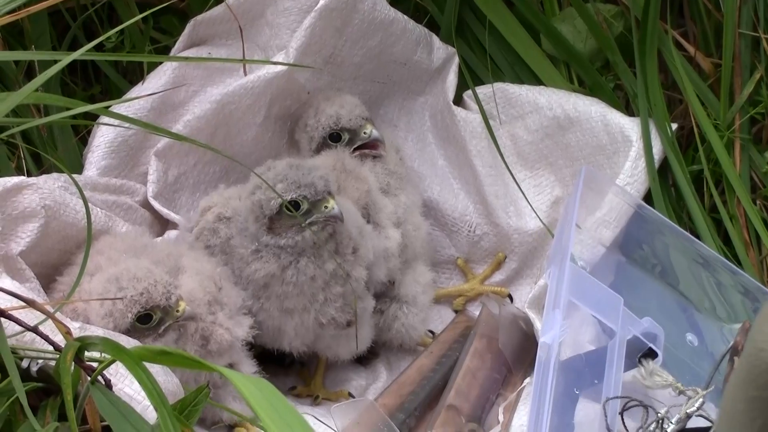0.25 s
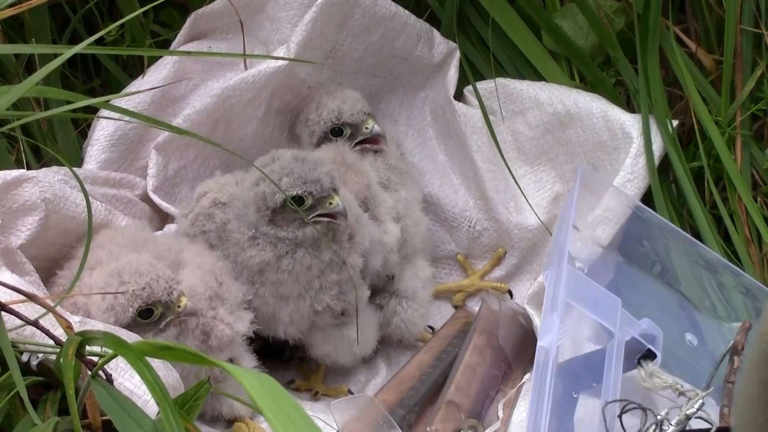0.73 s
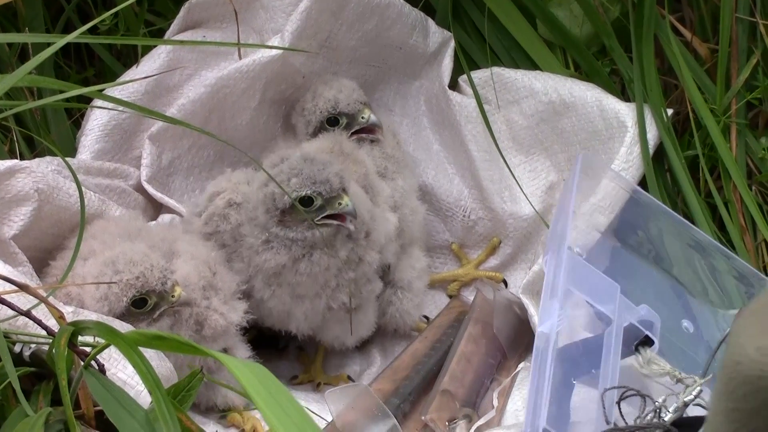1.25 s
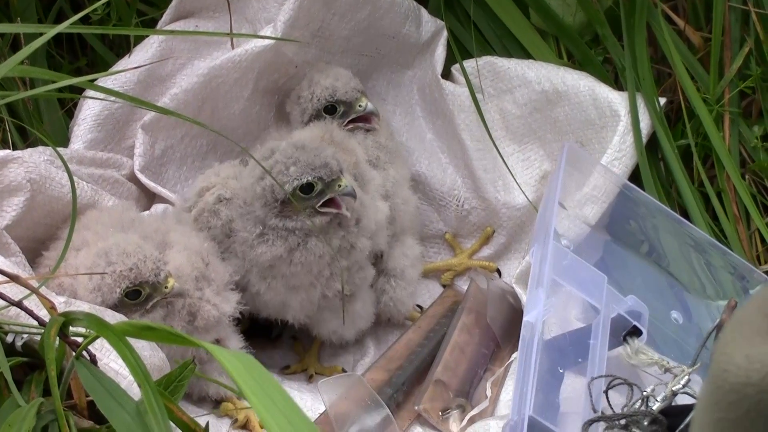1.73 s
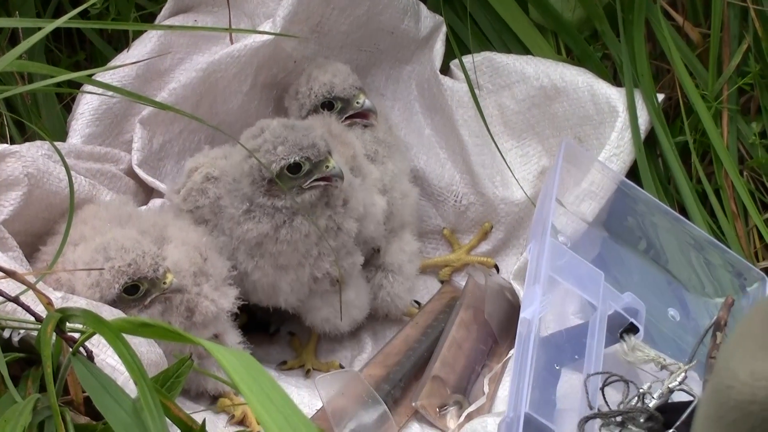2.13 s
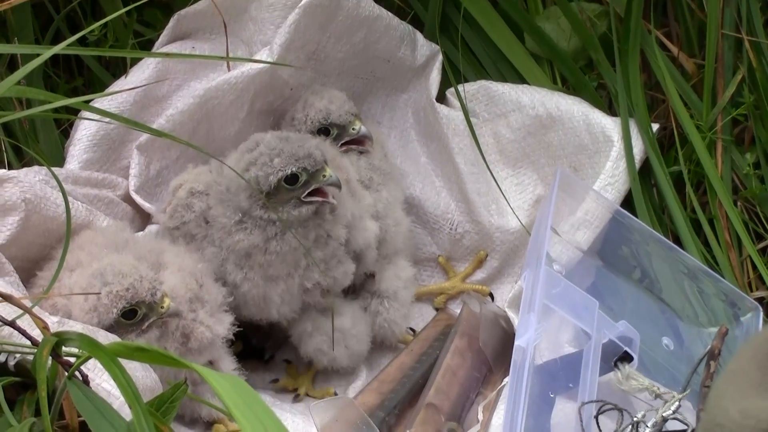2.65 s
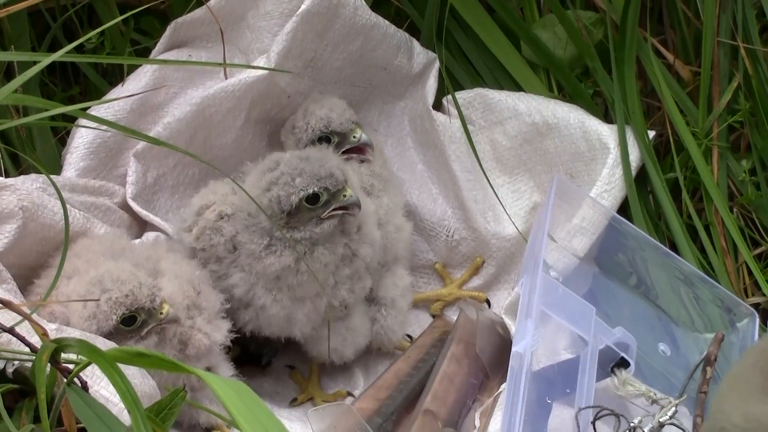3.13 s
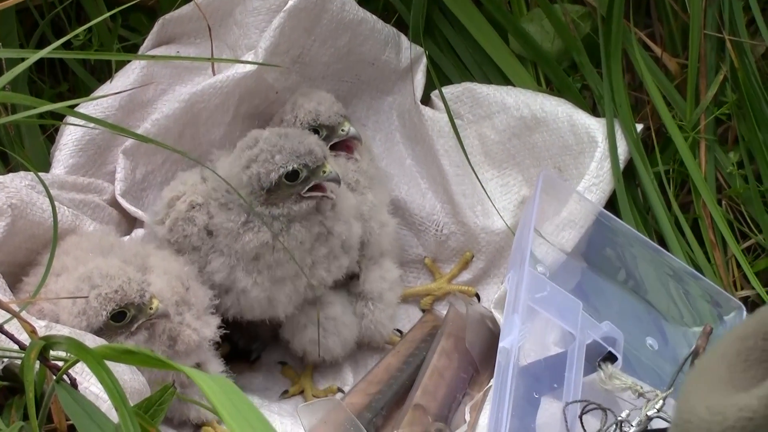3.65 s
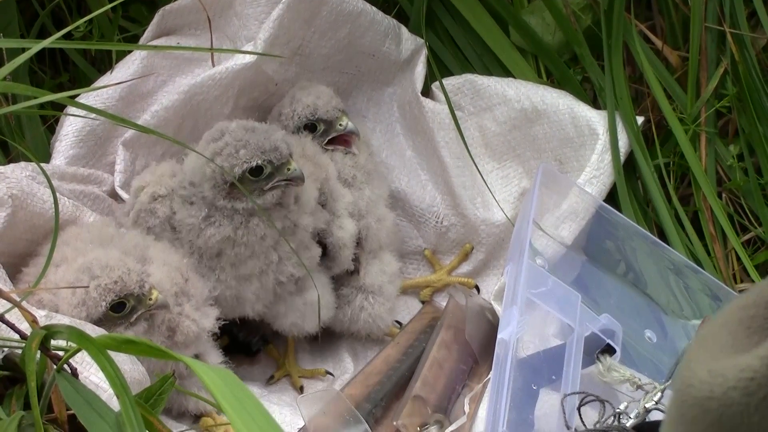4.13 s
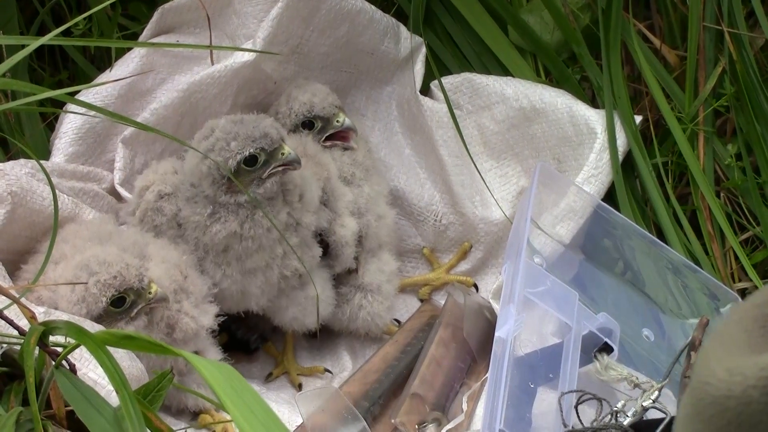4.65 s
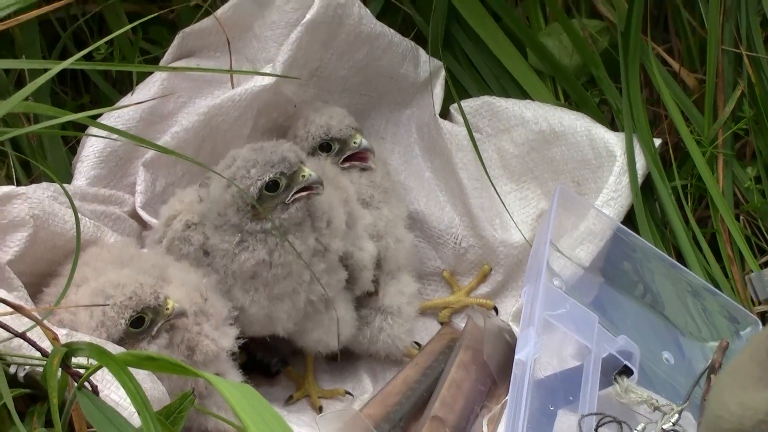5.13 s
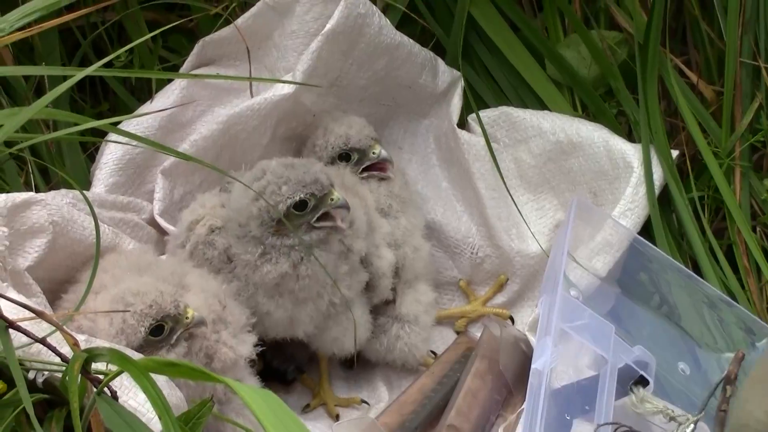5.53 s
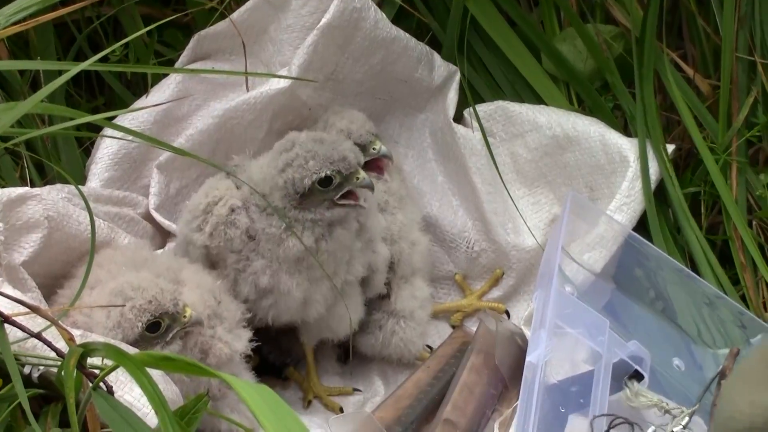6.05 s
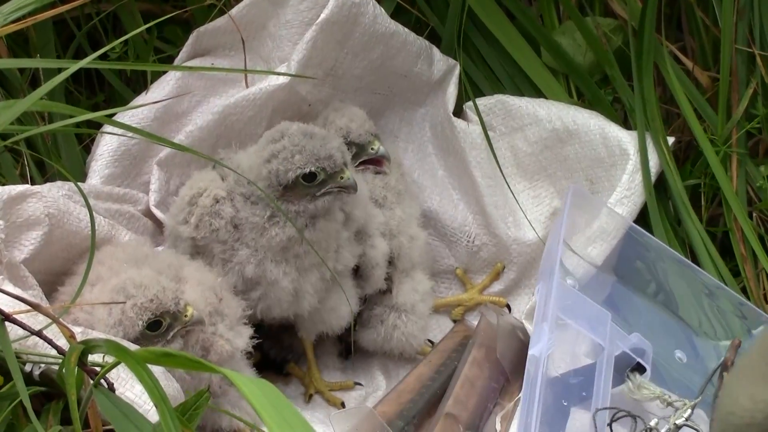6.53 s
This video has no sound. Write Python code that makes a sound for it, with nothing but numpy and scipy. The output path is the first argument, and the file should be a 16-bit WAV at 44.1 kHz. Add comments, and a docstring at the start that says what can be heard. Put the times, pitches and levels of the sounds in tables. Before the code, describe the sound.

A falcon chick cries close by, about four times a second from start to finish, each short cry breaking from a clear note into a rasp and a shrill whistle. A second chick adds soft peeps early on and again in the second half. A plastic box is knocked in a few clusters, small metal things clink, and cloth and grass rustle faintly in quiet open air.

```python
"""Kestrel chicks in the grass.

The nearest chick cries four times a second: each cry opens clear, breaks into a hoarse
period-doubled rasp, leaps to a shrill whistle and drops away. A second adds soft arched peeps.
Beside them a plastic box is knocked, small metal things clink, and cloth and grass rustle."""
import sys
import numpy as np
from scipy import signal
from scipy.fft import rfft, irfft
from scipy.io import wavfile
from scipy.ndimage import uniform_filter1d, minimum_filter1d

SR = 44100
rng = np.random.default_rng(int(sys.argv[2]) if len(sys.argv) > 2 else 0)


def generate_wav(signal):
    """Clip the signal to [-1, 1] and save it as 16-bit WAV at the path in sys.argv[1]."""
    frames = np.transpose(np.atleast_2d(signal))
    scaled = np.clip(frames, -1, 1) * 32767
    pcm = np.round(scaled).astype(np.int16)
    wavfile.write(sys.argv[1], SR, pcm)


N = 299880
TOP_HZ = 16000

# breath through throat and beak: freq_hz, gain_db
BREATH_SPECTRUM = [(500, -41), (1900, -12), (2600, -37), (3400, 0), (4300, -10), (5600, 1.5), (7000, -16),
                   (8600, 4), (10200, -7), (11400, -22), (14500, -19), (16000, -36.5)]
# small metal things: freq_hz, gain_db, t60_s
METAL_MODES = [(5830, -4, 0.037), (7500, -4, 0.072), (9360, -5, 0.049), (10900, -10, 0.07),
               (11290, 5, 0.05), (11310, 0.5, 0.13), (13660, -13, .04)]


def undb(db):
    """Decibels to gain."""
    return 10 ** (np.asarray(db) / 20)


def unit(x):
    """Scale to rms 1."""
    return x / np.sqrt(np.mean(x ** 2) + 1e-18)


def gain_at(hz, spectrum):
    """Gain of a (freq_hz, gain_db) spectrum at hz."""
    freq_hz, gain_db = np.transpose(spectrum)
    return undb(np.interp(np.log(np.maximum(hz, 1)), np.log(freq_hz), gain_db))


def colour(x, spectrum):
    """Filter by a spectrum; rms 1."""
    return unit(irfft(rfft(x) * gain_at(np.fft.rfftfreq(len(x), 1 / SR), spectrum), len(x)))


def coloured_noise(size, spectrum):
    """Noise with a spectrum; rms 1."""
    return colour(rng.standard_normal(size), spectrum)


def wobble(size, hz):
    """Random motion slower than hz; rms about 1."""
    padded = size + SR // 10
    freq_hz = np.fft.rfftfreq(padded, 1 / SR)
    return unit(irfft(rfft(rng.standard_normal(padded)) / (1 + (freq_hz / hz) ** 4)))[:size]


def add(track, start_s, sound):
    """Mix a sound into a track."""
    i = max(int(start_s * SR), 0)
    track[i:i + len(sound)] += sound[:max(N - i, 0)]


def ring(t, modes, scatter_db):
    """Decaying modes; every blow weights them differently."""
    out = 0
    for hz, db, t60_s in modes:
        weight = undb(db + scatter_db * rng.standard_normal()) * rng.choice([-1, 1])
        out = out + weight * np.sin(2 * np.pi * hz * t) * undb(-60 * t / t60_s)
    return out


def partials(hz, phase, orders, throat, treble_db=0, flutter_db=1.5):
    """Multiples of the syrinx's pitch, each weighted by the throat."""
    out = 0
    for k in orders:
        db = treble_db * (k > 2) + flutter_db * (k != 2) * wobble(len(hz), 88)
        out = out + gain_at(k * hz, throat) * undb(db) * (k * hz < TOP_HZ) * np.sin(k * phase)
    return np.sqrt(2) * out


def cry(start_s, open_s, rasp_s, whistle_s, open_hz, top_hz, open_db, treble_db, rough):
    """A clear note rises with pressure, rasps, leaps to a whistle and drops as the pressure goes."""
    # throat and open beak, clear note: freq_hz, gain_db
    clear_throat = [(1100, 10), (1750, -17), (2150, -17), (2600, -13), (3300, 5), (4300, -1), (5000, -15),
                    (6000, -24.5), (6400, -21.5), (7200, -18), (8450, -15.5), (9100, -17.5), (10400, -27.5),
                    (12500, -36), (15000, -41)]
    # the same in the rasp: freq_hz, gain_db
    rasp_throat = [(850, -22.5), (1700, -16.5), (2600, -17), (3350, -2), (4250, -0.5), (5100, -9),
                   (6000, -18.5), (7000, -23), (8600, -34), (10000, -34), (12000, -44), (15000, -50)]
    whistle_db, fall_s, fall_rough = -7.5, .015, .66
    break_s, leap_s, release_s = start_s + np.cumsum([open_s, rasp_s, whistle_s])
    t = np.arange(start_s, release_s + fall_s, 1 / SR)
    start_hz, end_hz = min(.93 * open_hz, 1750), .96 * top_hz
    rasp_hz = top_hz * (.955 - .145 * rough)
    rasp_db = whistle_db - 6.5 * min(rough / .37, 1)
    # time_s, pitch_hz, level_db, rasp_share
    knots_s, *curves = np.transpose([
        (start_s, start_hz, open_db - 18.5, 0),
        (start_s + .155 * open_s, .8 * start_hz + .2 * open_hz, open_db - 10.5, 0),
        (start_s + .6 * open_s, open_hz, open_db - .5, 0),
        (break_s - .001, open_hz, open_db - .5, 0),
        (break_s + .0041, .97 * rasp_hz, rasp_db - 4.5 * rough, rough),
        (break_s + .462 * rasp_s, 1.008 * rasp_hz, rasp_db, rough),
        (leap_s - .106 * rasp_s, .8 * rasp_hz + .2 * top_hz, whistle_db - 5.27 * rough, .25 * rough),
        (leap_s + .021 * whistle_s, .96 * top_hz, whistle_db, 0),
        (leap_s + .18 * whistle_s, top_hz, whistle_db, 0),
        (leap_s + .51 * whistle_s, top_hz, whistle_db, 0),
        (leap_s + .792 * whistle_s, .65 * top_hz + .35 * end_hz, whistle_db - .7, 0),
        (release_s - .0005, end_hz, whistle_db - 3, 0),
        (release_s + .188 * fall_s, .875 * end_hz, whistle_db - 12.5, fall_rough),
        (release_s + .642 * fall_s, .76 * end_hz, whistle_db - 20, fall_rough),
        (release_s + fall_s, .594 * end_hz, whistle_db - 43, fall_rough)])
    hz, db, hoarse = (np.interp(t, knots_s, curve) for curve in curves)
    hoarse = np.clip(hoarse, 0, 1)
    whistling = np.interp(t, [leap_s - .008, leap_s, release_s, release_s + .0045], [0, 1, 1, 0])
    waver = .003 * wobble(len(t), 150) + .008 * hoarse * wobble(len(t), 300)
    jitter_rad = (.017 + .035 * hoarse) * wobble(len(t), 900)
    phase = 2 * np.pi * np.cumsum(hz * (1 + waver)) / SR + jitter_rad
    clear = partials(hz, phase, range(1, 9), clear_throat, whistling * treble_db - 3, flutter_db=1.9)
    # strong and weak cycles alternate unsteadily: smeared lines between the harmonics
    slip_rad = .18 * wobble(len(t), 250)
    harmonics = partials(hz, phase, range(1, 9), rasp_throat, flutter_db=5.5)
    half_orders = partials(hz, phase + slip_rad, np.arange(9) + .5, rasp_throat, flutter_db=4.5)
    voice = (1 - hoarse) * clear + .74 * hoarse * (harmonics + .67 * half_orders)
    shimmer = 1 + (.025 + .17 * hoarse) * wobble(len(t), 500)
    falling = t > release_s
    turbulence = undb(-27.5) + undb(-37) * whistling + undb(-20.5) * hoarse + undb(-13.5) * falling
    hiss = coloured_noise(len(t), BREATH_SPECTRUM) * turbulence
    return undb(db) * (voice * shimmer + hiss)


def peep(length_s, crest_hz, level_db):
    """A soft unsteady arch: pitch and loudness rise and fall with the pressure."""
    # throat, beak less open: freq_hz, gain_db
    soft_throat = [(1500, -29.5), (2100, -12), (3200, -1), (4000, 2.5), (4500, -5.5), (5200, -5),
                   (6200, -22), (7200, -11.5), (8300, -22), (10400, -26.5), (14500, -45)]
    rise_s, fall_s = .6 * length_s, .4 * length_s
    t = np.arange(-rise_s, fall_s, 1 / SR)
    slack = np.maximum(-t / rise_s, t / fall_s)  # 0 at the crest, 1 at the ends
    hz = crest_hz * (1 - .21 * slack ** 2 - .0833 * slack ** 8)
    phase = 2 * np.pi * np.cumsum(hz * (1 + .01 * wobble(len(t), 200))) / SR
    hiss = undb(-24) * coloured_noise(len(t), BREATH_SPECTRUM)
    voice = partials(hz, phase, range(1, 8), soft_throat) + hiss
    return voice * undb(level_db - 15.5 * slack ** 1.5 + 1.8 * wobble(len(t), 180)) * (1 - slack ** 5)


def chicks():
    """The near chick cries; the second peeps."""
    # near chick: start_s, open_s, rasp_s, whistle_s, open_hz, top_hz, open_db, treble_db, roughness
    cries = [(.148, 0.022, .026, 0.037, 1660, 2006, -18.5, 6.5, 0.62),
             (0.396, 0.025, 0.032, 0.029, 1692, 2005, -16.5, 7, 0.75),
             (0.648, 0.03, 0.029, 0.025, 1675, 1974, -16, 4.5, 0.66),
             (0.886, 0.025, .034, 0.03717, 1860, 2105, -10, 10, 1),
             (1.125, 0.019, 0.034, .029, 1768, 2039, -13, 7.5, 0.87),
             (1.36, 0.02, .036, 0.02654, 1760, 2080, -14.5, 8, 0.87),
             (1.594, 0.02, .028, .04, 1810, 2093, -11.5, 8, 0.89),
             (1.833, 0.02, 0.033, 0.037, 1647, 2113, -21.5, 9, 0.9),
             (2.087, 0.018, 0.041, 0.032, 1824, 2090, -12, 7.5, 0.89),
             (2.332, 0.016, 0.037, 0.026, 1758, 2042, -15.5, 4.5, 0.77),
             (2.571, 0.025, 0.017, .039, 1778, 2070, -13.5, 4.5, 0.87),
             (2.785, 0.019, 0.026, 0.047, 1904, 2130, -10.5, 10.5, 1.23),
             (3.028, 0.015, 0.045, .034, 1637, 2090, -21, 5.5, 0.93),
             (3.306, .029, 0.032, 0.039, 1875, 2100, -11, 8.5, 0.99),
             (3.575, 0.023, 0.03, 0.036, 1782, 2073, -15, 4, 0.9),
             (3.8, 0.012, 0.042, 0.036, 1750, 2160, -19.5, 11, 0.87),
             (4.026, 0.0338, .016, 0.043, 1879, 2130, -7.5, 10, 0.83),
             (4.303, .041, .031, .028, 1817, 2000, -11, 4.5, 0.76),
             (4.573, 0.034, 0.025, 0.039, 1808, 2045, -12, 5.5, 0.9),
             (4.83, .041, 0.01405, 0.041, 1815, 2077, -9.5, 8.5, 0.84),
             (5.078, 0.026, 0.025, 0.037, 1824, 2060, -10, 8, 0.01),
             (5.32, 0.034, 0.019, 0.036, 1787, 2034, -12, 5, 0.78),
             (5.628, 0.04134, 0.022, 0.026, 1947, 2186, -8.5, 12.5, 0.41),
             (5.883, 0.05, .016, 0.031, 2102, 2115, -7, 9, .3),
             (6.149, 0.024, 0.043, 0.03127, 1848, 2124, -11.5, 9, 1.21),
             (6.39, 0.015, 0.033, 0.04, 1795, 2110, -15, 7, 1.05),
             (6.676, 0.039, 0.028, 0.02, 1744, 2070, -16, 4.5, 0.7)]
    # second chick: start_s, length_s, crest_hz, level_db
    peeps = [(0.304, 0.11, 1986, -20.5), (0.479, 0.1, 1962, -24.5), (0.836, 0.13, 2015, -21.5),
             (4.164, 0.13, 1998, -20.5), (4.474, .113, 2154, -28), (4.651, 0.12, 2110, -28.5),
             (4.987, 0.098, 2057, -23), (5.145, 0.098, 2080, -29), (5.286, 0.12, 2184, -26.5),
             (5.454, 0.11, 2134, -28), (6.097, 0.13, 2134, -29)]
    out = np.zeros(N)
    for start_s, *shape in cries:
        add(out, start_s, cry(start_s, *shape))
    for start_s, *shape in peeps:
        add(out, start_s, peep(*shape))
    return out


def box_knocks():
    """The struck plastic wall rings briefly, the nearest modes answer, the contact cracks."""
    # blows: start_s, level_db, wall_hz, crack_re_body_db
    blows = [(.825, -22, 830, -11), (.86, -20.5, 820, -12), (2.2132, -22.5, 1500, 1),
             (2.498, -22.5, 1436, 0), (2.521, -20.5, 1200, 1.5), (2.73, -23, 1395, -4.5),
             (3.163, -7.5, 944, -13), (3.179, -11.5, 934, -2.5), (3.209, -22.5, 920, -1.5),
             (3.239, -20, 1000, -1), (3.283, -22.5, 1027, -6), (3.483, -20.5, 588, -4.5),
             (3.505, -18, 870, -8.5), (5.615, -13.5, 870, -9.5), (5.627, -14, 1310, -6),
             (5.67, -7, 538, -1.5), (5.706, -14.5, 1230, -4.5), (5.744, -10.5, 585, -11),
             (5.796, -11, 820, -28.5), (5.813, -3.5, 703, -11), (5.835, -14.5, 1170, -3.5),
             (5.874, -12.5, 540, -7), (6.315, -23, 640, -27.5)]
    # box resonances: freq_hz, gain_db, t60_s
    box_modes = [(482, -12, 0.028), (660, -16, 0.022), (952, -12, 0.061), (1465, -2, 0.017),
                 (2310, -21, 0.023), (3320, -2, 0.036)]
    # contact noise of an 850 Hz wall: freq_hz, gain_db
    crack_spectrum = [(60, -38), (330, -53), (620, 3), (1400, 4), (3000, -3.5), (4500, -13.5),
                      (9000, -11.5), (15000, -50)]
    out, t = np.zeros(N), np.arange(SR // 8) / SR
    attack = 1 - np.exp(-t / .00077)
    crack_decay = np.exp(-t / .0036) + .072 * np.exp(-t / .022)
    for start_s, level_db, wall_hz, crack_db in blows:
        modes = [(hz, db - 7 * abs(np.log2(hz / wall_hz)), t60_s) for hz, db, t60_s in box_modes]
        wall = np.sin(2 * np.pi * wall_hz * t) * np.exp(-t / .0033)
        body = wall + ring(t, modes, scatter_db=-1.5)
        # a smaller, stiffer spot gives a thinner crack
        spectrum = [(hz * (wall_hz / 850) ** .5, db) for hz, db in crack_spectrum]
        crack = undb(crack_db) * coloured_noise(len(t), spectrum) * crack_decay
        add(out, start_s, undb(level_db + 2.5) * attack * (body / np.abs(body).max() + crack))
    return out


def clinks():
    """Struck metal: tiny ticks with a thin high ring."""
    # metal contacts: start_s, level_db
    strikes = [(.825, -25), (1.077, -26.5), (1.3091, -30), (2.521, -22), (2.7683, -21), (3.1646, -24),
               (3.212, -25), (3.244, -22.5), (3.954, -28), (4.1804, -13.5), (4.2118, -19), (4.247, -22.5),
               (4.289, -15), (4.515, -19), (4.7685, -18.5), (5.5638, -20), (5.593, -15), (5.8062, -14),
               (5.8495, -16)]
    out, t = np.zeros(N), np.arange(SR // 5) / SR
    tick_decay = np.exp(-t / .0059) + .15 * np.exp(-t / .038)
    for start_s, level_db in strikes:
        tick = coloured_noise(len(t), [(1000, -17), (4500, 0), (10000, 1), (15000, -13)]) * tick_decay
        metal = ring(t, METAL_MODES, scatter_db=4)
        add(out, start_s, undb(level_db) * (.23 * tick + .085 * metal))
    return out


def jingles():
    """Metal slides over metal; dense tiny contacts keep it ringing."""
    # sliding metal: start_s, end_s, level_db
    slides = [(4.168, 4.28, -37), (4.415, 4.556, -54.5), (5.591, 5.68, -37), (5.799, 5.875, -44)]
    out, t = np.zeros(N), np.arange(SR // 10) / SR
    for start_s, end_s, level_db in slides:
        size = max(int((end_s - start_s) * SR), 100)
        contacts = rng.standard_normal(size) * (rng.random(size) < .03) * np.hanning(size) ** .5
        ringing = signal.fftconvolve(contacts, ring(t, METAL_MODES, scatter_db=5))
        scrape = colour(contacts, [(2000, -20), (6000, -4), (10500, 0), (13000, -18.5), (16000, -16)])
        add(out, start_s, undb(level_db + 3.5) * unit(ringing))
        add(out, start_s, undb(level_db + 2.5) * scrape)
    return out


def rustle(attack_s=.0072, release_s=.028):
    """Cloth and stalks: dense small contacts of unequal size, in bouts."""
    # rummaging: start_s, length_s, level_db
    bouts = [(0.838, 0.059, -42), (1.958, 0.024, -39), (2.51, 0.057, -44.5), (3.18, .12, -42.5),
             (3.491, 0.021, -34.5), (5.593, 0.1, -31.5), (5.781, 0.087, -29), (6.32, 0.057, -45)]
    # cloth and grass: freq_hz, gain_db
    rustle_spectrum = [(100, -13.5), (330, -19), (550, 3.5), (850, 0.5), (1300, -2), (2500, -7.5),
                       (5000, -10.5), (10000, -17), (15000, -31)]
    t = np.arange(N) / SR
    effort = undb(-50)  # the chicks never keep quite still
    for start_s, length_s, level_db in bouts:
        attack = np.clip(1 + (t - start_s) / attack_s, 0, 1)
        release = np.exp(-np.maximum(t - start_s - length_s, 0) / release_s)
        effort = np.maximum(effort, undb(level_db) * attack * release)
    grains = rng.standard_normal(N) * undb(2 * rng.exponential(size=N)) * (rng.random(N) < .3)
    return colour(grains, rustle_spectrum) * effort * undb(3.84 * wobble(N, 49) + .5)


def ground_bumps():
    """Soft low thuds that die quickly."""
    # bumps on the ground: start_s, level_db, pitch_hz
    thuds = [(1.952, -50.5, 216), (3.483, -43, 193), (5.079, -48, 60.3), (5.14, -45, 50.4),
             (5.228, -45.5, 94.6), (6.121, -54, 69.5), (6.208, -46.5, 73.6)]
    out, t = np.zeros(N), np.arange(SR // 4) / SR
    envelope = (1 - np.exp(-t / .001)) * np.exp(-t / .04)
    for start_s, level_db, hz in thuds:
        spectrum = [(hz / 4, -14), (hz, 0), (2 * hz, -10), (4 * hz, -45), (12 * hz, -80)]
        add(out, start_s, undb(level_db + 4) * coloured_noise(len(t), spectrum) * envelope)
    return out


def foliage_scatter(x, t60_s=.33, wet_db=-29, side_db=-17):
    """Faint reflections from grass and trees."""
    spectrum = [(300, -45), (3400, -1), (4200, 1.5), (4800, 7), (6200, 3.5), (8000, -6), (15000, -3.5)]
    t = np.arange(SR) / SR
    envelope = undb(-60 * t / t60_s) * (1 - np.exp(-t / .026))
    tails = [coloured_noise(SR, spectrum) * envelope for _ in range(2)]
    mid, side = (signal.fftconvolve(x, unit(tail) / np.sqrt(SR))[:N] for tail in tails)
    return undb(wet_db) * (mid + undb(side_db) * side * np.array([[1], [-1]]))


def open_air(mid_db=-51, side_db=-54):
    """Quiet air; its rumble differs left and right."""
    # air common to both channels: freq_hz, gain_db
    mid_spectrum = [(25, 1.5), (60, -2.5), (125, -3.5), (250, -6), (500, -8), (800, -4.5), (1400, -24),
                    (3000, -16.5), (8000, -26.5), (15000, -42)]
    side_spectrum = [(30, -5), (100, -9.5), (250, -10), (1000, -27), (14000, -28)]
    mid = coloured_noise(N, mid_spectrum) * undb(wobble(N, 3.1))
    side = coloured_noise(N, side_spectrum) * undb(2.1 * wobble(N, 1.1))
    return undb(mid_db) * mid + undb(side_db) * side * np.array([[1], [-1]])


def scene():
    """Stereo mix; the birds sit a hair right of centre."""
    birds = chicks()
    things = box_knocks() + clinks() + jingles() + rustle() + ground_bumps()
    pan = undb([[-.25], [.25]])
    return birds * pan + things + foliage_scatter(birds + things) + open_air()


def record(dry, ceiling=.82):
    """Limiter, clipper, low-pass: whistles flatten, brief knocks slip past the limiter."""
    peaks = -minimum_filter1d(-np.abs(dry).max(axis=0), SR // 500)
    gain = np.minimum(1, ceiling / (uniform_filter1d(peaks, SR // 200) + 1e-9))
    lowpass = signal.ellip(10, .1, 80, TOP_HZ, fs=SR, output="sos")
    return signal.sosfilt(lowpass, np.clip(dry * gain, -1, 1))


dry = scene()
out = record(dry)
generate_wav(out)
```